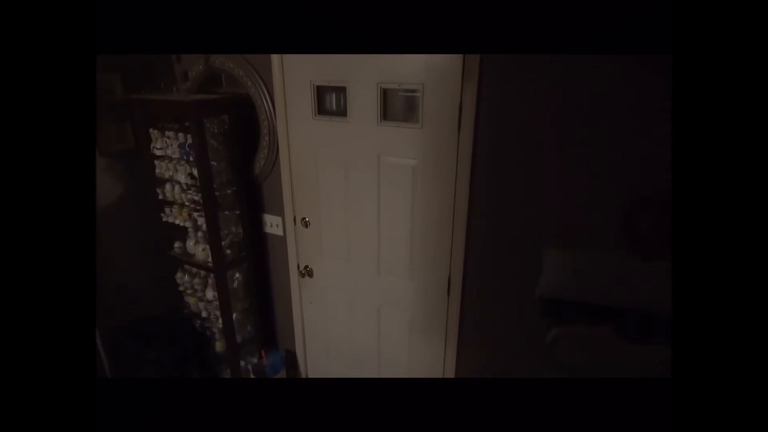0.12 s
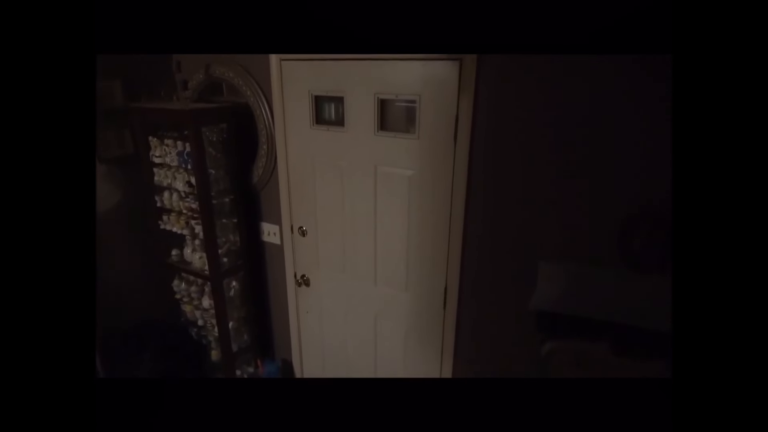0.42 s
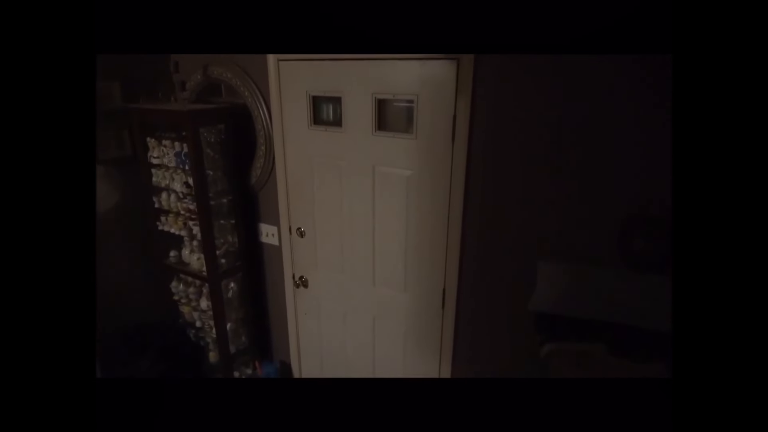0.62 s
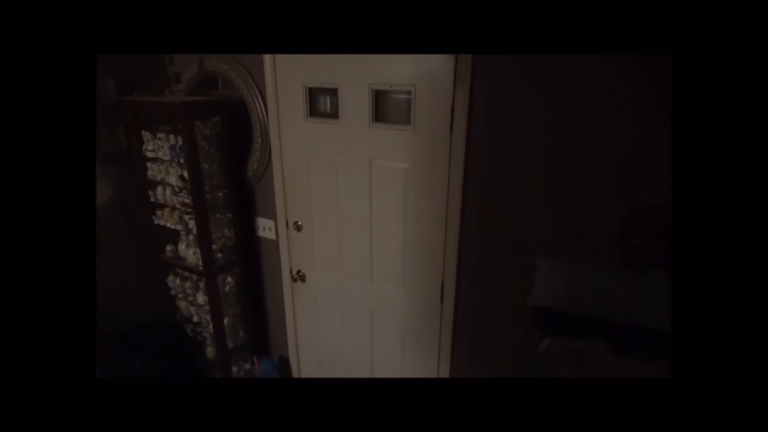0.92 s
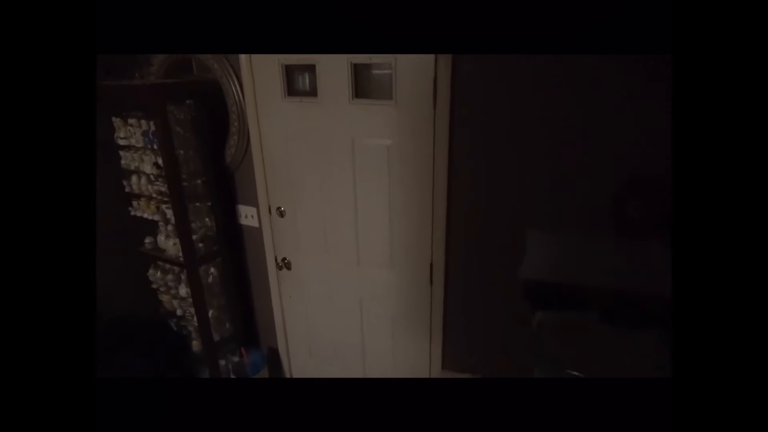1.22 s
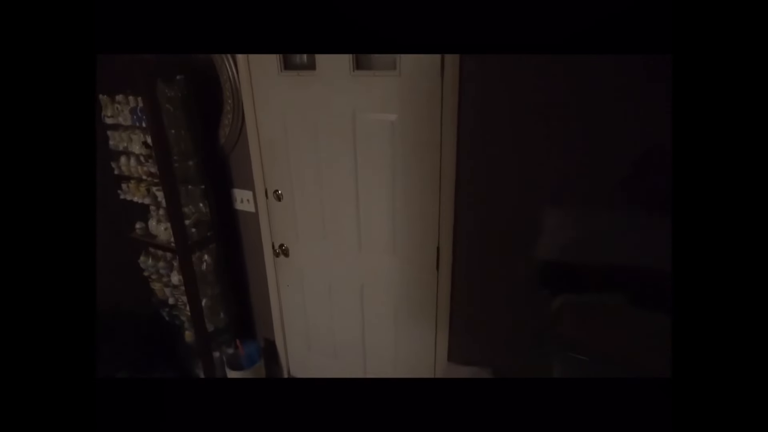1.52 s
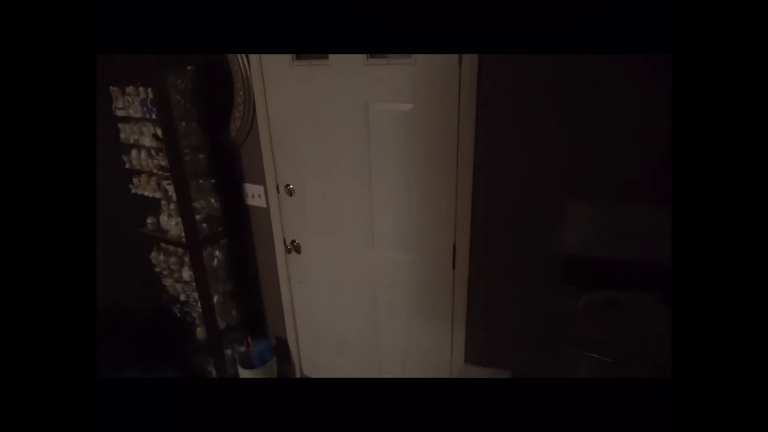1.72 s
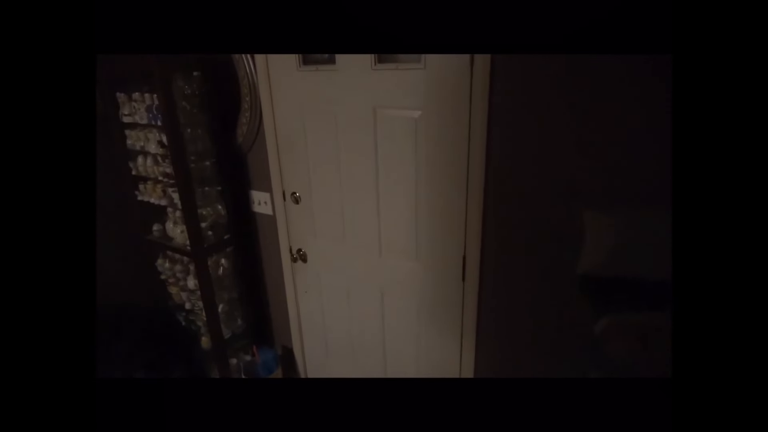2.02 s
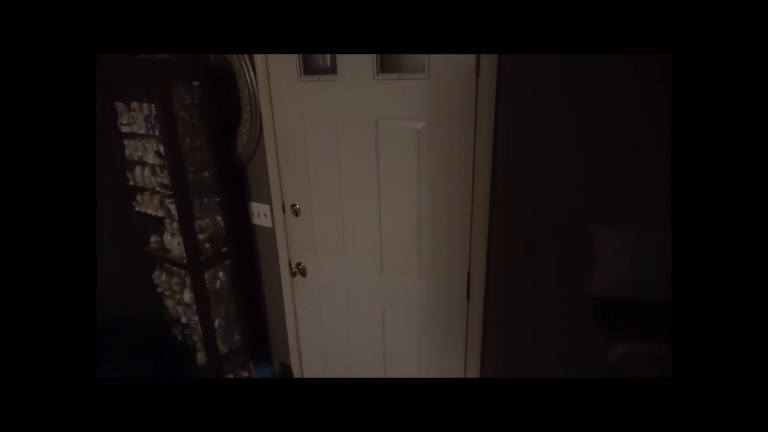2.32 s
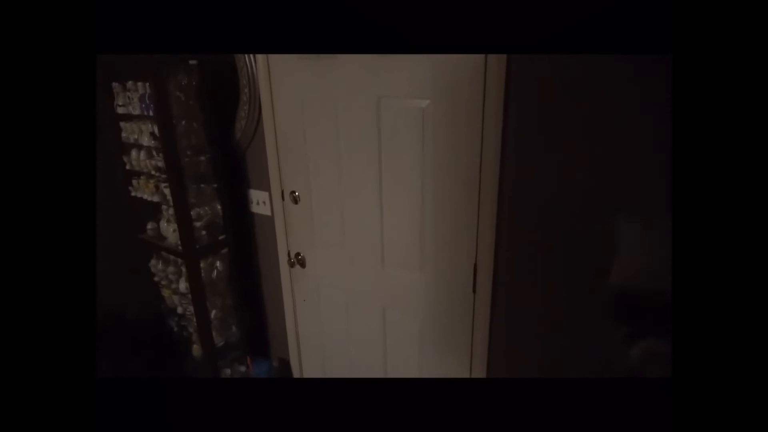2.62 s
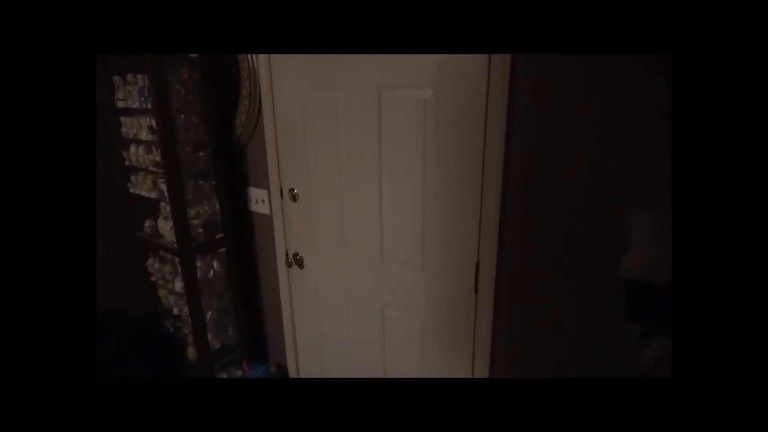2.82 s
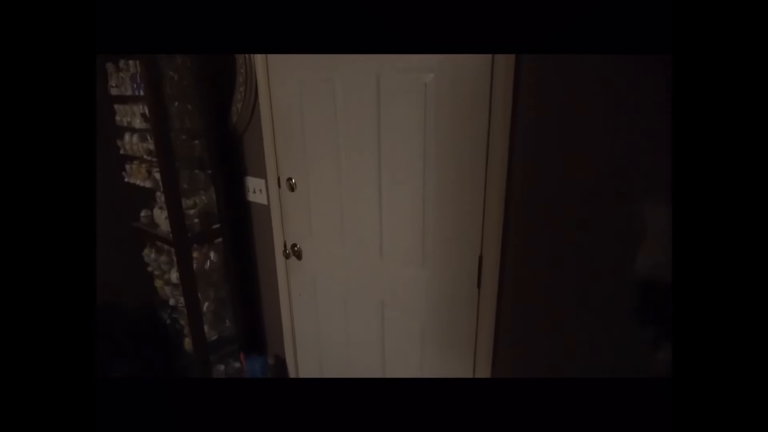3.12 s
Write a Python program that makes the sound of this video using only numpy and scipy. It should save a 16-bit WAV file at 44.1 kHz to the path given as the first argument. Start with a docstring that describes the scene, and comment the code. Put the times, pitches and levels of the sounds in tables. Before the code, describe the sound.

Heavy knocks on a wooden front door, heard from inside a quiet house. The low boom of an earlier knock is dying at the start; a bright scuff at 0.15 s leads into a knock at 0.24 s. Soft clothing-like rustles swell around 0.9 and 1.4-1.8 s, with a faint tick at 1.63. Three knocks follow at 1.9, 2.3 and 2.8 s, booming and fading over steady hum and airy rush.

```python
"""The boom of an earlier knock dies over the hum and rush of a quiet house; a bright scuff, then a heavy
knock on a wooden front door, heard from inside; later a set of three, among soft swells of hiss.
Each knock is a dull touch of noise, a clack (crack, panel modes, noise clatter) and slow-building low modes.
The house is coloured noise plus sines; scuff, tick and swells are coloured noise under envelopes."""
import sys
import numpy as np
from scipy import signal
from scipy.fft import rfft, irfft, next_fast_len
from scipy.io import wavfile
from scipy.ndimage import map_coordinates

SR = 44100
rng = np.random.default_rng(int(sys.argv[2]) if len(sys.argv) > 2 else 0)


def put_to_file(sound):
    """Save the sound as 16-bit audio at rate SR, in the file named by the first command-line argument."""
    columns = np.atleast_2d(sound).T  # one column per channel
    safe = np.clip(columns, -1, 1)
    whole_steps = np.round(safe * 32767)
    wavfile.write(sys.argv[1], SR, whole_steps.astype(np.int16))


N = 143325
LEFT_RIGHT = np.array([[1], [-1]])


def amp(db):
    """Decibels to gain."""
    return 10 ** (np.asarray(db) / 20)


def unit(x):
    """Scale to rms 1."""
    return x / np.sqrt(np.mean(x ** 2) + 1e-20)


def along(points, hz):
    """Interpolate (frequency [Hz], value) points on a log-frequency axis."""
    f, v = np.transpose(points)
    return np.interp(np.log(hz + 1), np.log(f + 1), v)


def since(start_s):
    """Seconds since start_s, for every sample."""
    return np.arange(N) / SR - start_s


def filtered(x, response):
    """Multiply the spectrum of x by a zero-phase response of frequency."""
    m = next_fast_len(N + SR // 2)
    gain = response(np.fft.rfftfreq(m, 1 / SR))
    return irfft(rfft(x, m) * gain, m)[..., :N]


def equalized(x, curve):
    """Filter x by (frequency [Hz], gain [dB]) points."""
    return filtered(x, lambda hz: amp(along(curve, hz)))


def noise(spectrum, correlation):
    """Coloured stereo noise of rms 1; mid and side shares set the left-right correlation."""
    def mid_side_gain(hz):
        angle = np.arccos(np.clip(along(correlation, hz), -1, 1)) / 2
        return amp(along(spectrum, hz)) * [np.cos(angle), np.sin(angle)]
    mid, side = filtered(rng.standard_normal((2, N)), mid_side_gain)
    return unit(np.array([mid + side, mid - side]))


def panned(x, balance):
    """Tilt left against right by (frequency [Hz], left-right [dB]) points."""
    return filtered(x, lambda hz: amp(np.outer([.5, -.5], along(balance, hz))))


def wobble(rate_hz):
    """A smooth random curve through rate_hz knots per second."""
    knots = rng.standard_normal(int(N * rate_hz / SR) + 4)
    return map_coordinates(knots, [np.arange(N) * rate_hz / SR])


def grain(depth_db, rate_hz):
    """Random roughness of level, rms 1."""
    return unit(amp(depth_db * wobble(rate_hz)))


def fade_in(t):
    """A smooth step from 0 to 1 just after t = 0, without a click."""
    edge_s = 0.0016
    return np.sin(np.pi / 2 * np.clip(t / edge_s, 0, 1)) ** 2


def ring(t, hz, db, t60_s, rise_s, spread_rad):
    """One mode that builds up and dies exponentially, random phase skew between microphones."""
    t = np.maximum(t, 0)
    skew_rad = spread_rad * rng.standard_normal() * LEFT_RIGHT
    envelope = amp(db - 60 * t / t60_s) * (1 - np.exp(-t / rise_s))
    return envelope * np.sin(2 * np.pi * hz * t + skew_rad)


def struck(start_s, source):
    """One second of a ringing source from start_s."""
    t, out = since(start_s), np.zeros((2, N))
    live = (t > 0) & (t < 1)
    out[:, live] = source(t[live])
    return out


# House rush spectrum: (frequency [Hz], relative density [dB])
HOUSE_SPECTRUM = [(12, -50), (20, -9.5), (106, -3.5), (148, 1.5), (196, -6), (491, -3.5), (631, -8),
                  (705, -1.5), (958, -11), (1230, -9), (1500, -16.5), (1670, -14.5), (1820, -18.5),
                  (3350, -25), (15500, -39.5)]
# House rush likeness: (frequency [Hz], left-right correlation [-1..1])
HOUSE_CORRELATION = [(60, 1), (240, .9), (600, 0.87), (1400, 0.93), (2200, 0.99), (4400, 1), (5600, 0.5),
                     (15000, 0.15)]
# House stereo balance: (frequency [Hz], left-right [dB])
HOUSE_BALANCE = [(40, 5), (120, -2), (240, 5), (480, -0.5), (950, -2), (2500, -0.5), (15000, -.5)]
# Appliance hum lines: (frequency [Hz], rms level before balance [dB])
HUM_LINES = [(86, -62.5), (119.6, -59), (240, -64.5), (479.3, -59.5), (598.5, -61), (694.5, -64.5)]


def house():
    """Steady rush of air plus the sine lines of an appliance's hum, phase-skewed between microphones."""
    rush_db, spread_rad = -49, 0.12
    out = amp(rush_db) * noise(HOUSE_SPECTRUM, HOUSE_CORRELATION)
    for hz, db in HUM_LINES:
        skew_rad = spread_rad * rng.standard_normal() * LEFT_RIGHT
        phase_rad = 2 * np.pi * (hz * since(0) + rng.random()) + skew_rad
        out = out + amp(db) * np.sqrt(2) * np.sin(phase_rad)
    return panned(out, HOUSE_BALANCE)


# Swells of hiss: (middle [s], Gaussian sigma [s], level [dB])
RUSTLE_SWELLS = [(0.865, 0.17, -62), (1.424, 0.096, -58), (1.618, 0.052, -58), (1.78, 0.046, -59),
                 (2.73, 0.17, -62.5), (2.965, .05, -64.5), (3.217, 0.066, -66.5)]
# Hiss spectrum: (frequency [Hz], relative density [dB])
RUSTLE_SPECTRUM = [(500, -26), (1400, 14.5), (2500, 4), (5000, 2), (8000, -2), (11000, -5), (15000, -10)]


def rustle():
    """Soft Gaussian swells of hiss, like clothing shifting."""
    swell = sum(amp(db) * np.exp(-.5 * (since(middle_s) / sigma_s) ** 2)
                for middle_s, sigma_s, db in RUSTLE_SWELLS)
    return swell * noise(RUSTLE_SPECTRUM, [(2000, 1.0), (8000, 0.79)])


# Tick spectrum: (frequency [Hz], relative density [dB])
TICK_SPECTRUM = [(800, -18), (1650, 7), (2400, -11), (3500, -21), (8000, -32)]
# Likeness of door noises and tick: (frequency [Hz], left-right correlation [-1..1])
DOOR_CORRELATION = [(300, 1), (1200, 0.98), (2500, 1), (5000, 1), (8000, 0.33), (13000, 0.97)]


def tick():
    """A faint tick of wood: a noise burst with abrupt onset and exponential decay."""
    start_s, level_db, t60_s = 1.626, -45.5, 0.078
    t = since(start_s)
    envelope = (t > 0) * amp(level_db - 60 * abs(t) / t60_s)
    return envelope * noise(TICK_SPECTRUM, DOOR_CORRELATION)


# Scuff spectrum: (frequency [Hz], relative density [dB])
SCUFF_SPECTRUM = [(350, -7), (800, -6), (1100, -0.5), (1600, -8), (2500, -7), (4600, -7), (7500, -9.5),
                  (9500, -13.5), (12000, -19), (15000, -31)]
# Scuff resonances: (frequency [Hz], width [Hz], lift [dB])
SCUFF_RESONANCES = [(2590, 230, 10.5), (3100, 220, 10.5), (4540, 140, 8), (5530, 120, 0), (6830, 100, 8)]


def scuff():
    """A quick bright scuff: resonant noise, rising and falling exponentially into a room tail."""
    peak_s, level_db, rise_t60_s, fall_t60_s = 0.1533, -35, 0.034, 0.12
    room_db, room_t60_s = -4.5, .25  # room_db relative to the stroke
    t = since(peak_s)
    before, after = np.maximum(-t, 0), np.maximum(t, 0)
    rise = amp(-60 * before / rise_t60_s)
    fall = np.hypot(amp(-60 * after / fall_t60_s), amp(room_db - 60 * after / room_t60_s))

    def resonances(f):
        return amp(sum(db / (1 + (2 * (f - hz) / width) ** 2) for hz, width, db in SCUFF_RESONANCES))

    hiss = unit(filtered(noise(SCUFF_SPECTRUM, [(2000, 1.0), (8000, 0.8)]), resonances))
    return amp(level_db) * rise * fall * hiss * grain(depth_db=1, rate_hz=500)


# Low modes of door and room: (frequency [Hz], level [dB], t60 [s], build-up time constant [s])
BOOM_MODES = [(72.7, -25.5, 0.5, 0.12), (86.8, -15, 0.37, 0.029), (108.9, -25.5, 0.38, 0.011),
              (124.8, -17.5, 0.66, 0.034), (136.44, -10.5, 0.23, 0.034), (152.1, -9, 0.4, 0.094),
              (211.1, -19, 0.29, 0.019), (220.4, -41.5, 0.8, 0.04), (240.6, -23, 0.482, 0.021),
              (259.2, -22.5, 0.31, 0.0091), (312.2, -30.5, 0.47, 0.0074), (333.7, -25, 0.15, 0.0113),
              (348.4, -23, 0.31, 0.021)]


def boom(t):
    """Low modes, nearly alike at every blow, beating as they fade; the door also pushes the room's air."""
    scatter_db, spread_rad = 0.25, .09
    out = ring(t, 29.3, -36, 0.97, 0.024, spread_rad)  # air push
    for hz, db, t60_s, rise_s in BOOM_MODES:
        out = out + ring(t, hz, db + scatter_db * rng.standard_normal(), t60_s, rise_s, spread_rad)
    return out


# Door panel modes: (frequency [Hz], level [dB], t60 [s])
PANEL_MODES = [(399, -31, 0.21), (458, -40, 0.57), (543, -35, 0.26), (580.6, -37.5, 0.32),
               (676, -41.5, 0.54), (775, -51, 0.35), (853, -38, 0.36), (893, -42, 0.6), (1010, -61, 0.094),
               (1099, -35.5, 0.11), (1142, -26.5, 0.32), (1173, -28, 0.32), (1280, -32, .28),
               (1362, -48, 0.38), (1516, -36, 0.16), (1668, -38, .28), (1874, -41.5, 0.23)]


def panels(t):
    """Panel modes, each with random level and a random delay under one cycle at every blow."""
    rise_s, scatter_db, spread_rad = 0.0052, 2.5, .28
    out = 0
    for hz, db, t60_s in PANEL_MODES:
        delay_s = rng.random() / hz
        mode_db = db + scatter_db * rng.standard_normal()
        out = out + ring(t - delay_s, hz, mode_db, t60_s, rise_s, spread_rad)
    return out


# Crack spectrum: (frequency [Hz], relative density [dB])
CRACK_SPECTRUM = [(150, -15), (330, 0), (560, -5), (800, -9), (1050, 3.5), (1220, 1.5), (1450, 2),
                  (1800, -4.5), (2600, -17.5), (5000, -25), (10000, -33), (15000, -37)]


def crack(t):
    """A decaying noise burst and its strong reflection."""
    level_db, t60_s, reflection_s, reflection_db = -24.5, 0.077, .027, -3.5

    def burst(t):
        return fade_in(t) * amp(level_db - 60 * abs(t) / t60_s)

    envelope = burst(t) + amp(reflection_db) * burst(t - reflection_s)
    return envelope * noise(CRACK_SPECTRUM, DOOR_CORRELATION)


# Clatter spectrum: (frequency [Hz], relative density [dB])
CLATTER_SPECTRUM = [(120, -0.5), (250, -5), (340, 3), (430, -0.5), (560, -0.5), (750, -4.5), (950, -5.5),
                    (1180, 1), (1500, -5.5), (1800, -10.5), (2200, -19.5), (3000, -24), (5000, -28.5),
                    (7500, -32), (11000, -42), (15000, -47)]
# Clatter decay: (frequency [Hz], t60 [s])
CLATTER_T60 = [(300, 0.21), (1200, 0.35), (2500, .33), (6000, 0.31), (13000, 0.24)]
# Level plateau before the decay: (frequency [Hz], hold [s])
CLATTER_HOLD = [(300, 0.073), (1200, 0.039), (2500, 0.035), (10000, 0.061)]


def clatter(start_s):
    """Dense wooden noise that holds, then dies in the room at a rate set per STFT band."""
    level_db = -25
    hz, frame_s, z = signal.stft(noise(CLATTER_SPECTRUM, DOOR_CORRELATION), SR, nperseg=256)
    late_s = np.maximum(frame_s - start_s - along(CLATTER_HOLD, hz)[:, None], 0)
    decay = amp(-60 * late_s / along(CLATTER_T60, hz)[:, None])
    body = signal.istft(z * decay, SR, nperseg=256)[1][:, :N]
    return amp(level_db) * body * grain(depth_db=1, rate_hz=220) * fade_in(since(start_s))


def clack(start_s):
    """Crack with its reflection, panel modes and clatter of one blow."""
    return crack(since(start_s)) + struck(start_s, panels) + clatter(start_s)


# First dull touch: (frequency [Hz], relative density [dB])
TOUCH_SPECTRUM = [(80, -13), (250, 4.5), (700, -10), (1200, 0), (1600, -10.5), (2200, -22), (6000, -37),
                  (15000, -55)]
# Blows: (time [s], boom gain [dB], lead-in [s], then six clack gains [dB], one per COLOUR_HZ)
KNOCKS = [(.243, -1.2, 0.013, -7, 5.5, 5, 1, -1, -4), (1.914, -1.4, 0.013, -0.5, 0, 0, 1.6, 0.5, -5),
          (2.327, -0.65, 0.012, 1.5, 0, -2.5, -3.5, -4.5, -1),
          (2.786, -0.23, .014, -1.5, -7, -0.5, 1, -4.5, 3)]
# Bands of the clack colour set by how the hand lands: (frequency [Hz])
COLOUR_HZ = [420, 630, 880, 1400, 3000, 9000]
# Gentle bass cut, deepest near 45 Hz: (frequency [Hz], gain [dB])
BASS_CUT = [(30, -6), (45, -9), (60, -4), (75, 0)]
# Door stereo balance: (frequency [Hz], left-right [dB])
DOOR_BALANCE = [(80, 1), (125, 3.5), (155, 4.4), (230, 8), (320, 2.5), (420, 5), (560, 3), (830, -0.2),
                (1200, 0), (1800, 1), (4000, -1.2), (10000, 1.5)]


def door():
    """Each blow: a short dull lead-in, a clack coloured by how the hand lands, and the boom."""
    touch_db = -27
    touch = amp(touch_db) * noise(TOUCH_SPECTRUM, [(300, 0.21)])
    out = amp(-1.5) * struck(-.215, boom)  # an earlier knock, still dying
    for start_s, boom_db, lead_s, *colour_db in KNOCKS:
        t = since(start_s)
        out += touch * np.clip(1 + t / lead_s, 0, 1) ** 0.99 * (1 - fade_in(t))
        out += equalized(clack(start_s), list(zip(COLOUR_HZ, colour_db)))
        out += amp(boom_db) * struck(start_s, boom)
    return panned(equalized(out, BASS_CUT), DOOR_BALANCE)


def scene():
    """The door over the quiet of the house."""
    return house() + rustle() + tick() + scuff() + door()


def record(dry, ceiling_db=-6, hardness=5):
    """Round the highest peaks, then cut everything above the band limit."""
    top_hz = 15650
    rounded = dry / (1 + abs(dry / amp(ceiling_db)) ** hardness) ** (1 / hardness)
    return filtered(rounded, lambda hz: hz < top_hz)


dry = scene()
out = record(dry)
put_to_file(out)
```